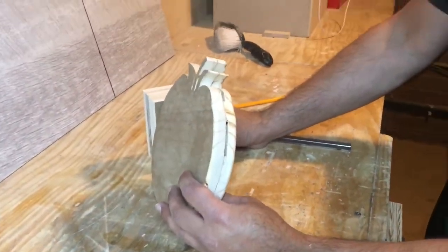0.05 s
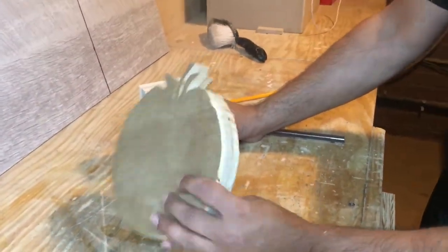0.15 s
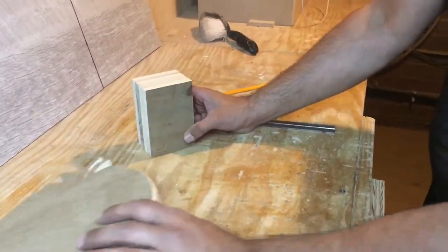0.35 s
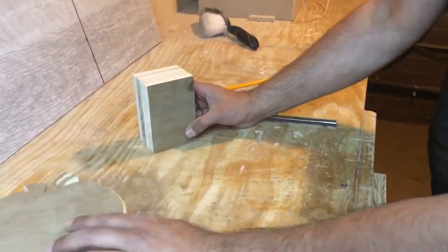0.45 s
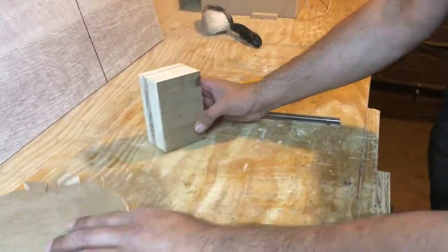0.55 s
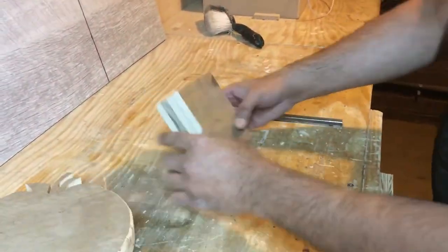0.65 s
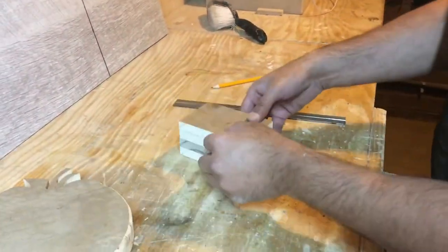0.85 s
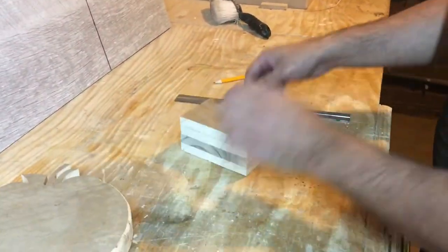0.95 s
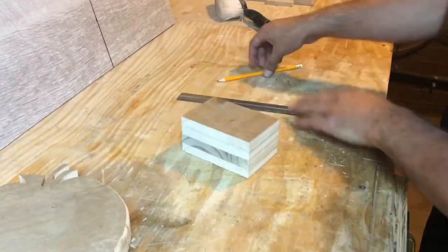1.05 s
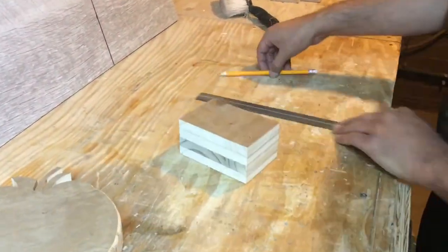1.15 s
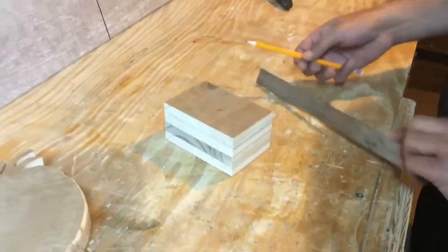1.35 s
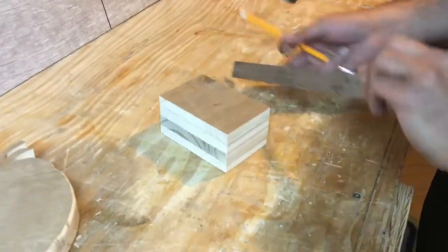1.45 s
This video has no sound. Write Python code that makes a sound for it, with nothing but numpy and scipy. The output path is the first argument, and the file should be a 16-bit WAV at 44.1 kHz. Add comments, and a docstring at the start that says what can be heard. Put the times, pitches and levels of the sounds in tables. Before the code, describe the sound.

Wooden pieces thump and slide on a bench, followed by a steel rule's light rasp.

```python
"""A plywood disc is laid on a wooden workbench and slid aside, juddering, with two tiny squeaks.
Next a block is tipped over, shuffled on its edge and dropped flat: each knock thumps on the
contact and rings block and bench top. Last, a steel rule is dragged off across the boards,
rasping on the grain and ringing thinly. Faint handling rustle and still air lie underneath,
and a short workshop echo follows every move."""
import sys
import numpy as np
from scipy import signal
from scipy.fft import rfft, irfft
from scipy.io import wavfile
from scipy.ndimage import uniform_filter1d, minimum_filter1d

SR = 44100
rng = np.random.default_rng(int(sys.argv[2]) if len(sys.argv) > 2 else 0)


def dump(signal):
    """Clip the signal to [-1, 1] and save it as 16-bit WAV at the path in sys.argv[1]."""
    limited = np.clip(np.atleast_2d(signal).T, -1, 1)
    pcm = np.round(limited * 32767).astype(np.int16)
    wavfile.write(sys.argv[1], SR, pcm)


N = 66150
T = np.arange(N) / SR

# hard knocks of the block (time [s], gain [dB], brightness [Hz], thump pitch [Hz], thump gain [dB],
# bench gain [dB], crack t60 [s], damping t60 [s])
BLOCK_KNOCKS = [(0.6238, -5, 2890, 432, 1, 10, 0.071, 1.5), (0.6325, -17, 1250, 510, 15, 21, 0.07, .5),
                (0.6530, -30.5, 800, 330, 8, 0, 0.038, 0.14), (0.7245, -35.5, 910, 484, 8.5, 0, .04, 0.18),
                (0.7585, -26, 2330, 489, 15, 10, 0.036, 0.63), (0.8040, -23.5, 915, 466, 11.5, 7, .04, .3),
                (0.8195, -41, 722, 485, 7, -1.5, 0.033, .3),
                (0.8655, -16, 1830, 603, -8.5, -13.5, 0.085, 0.49),
                (0.8695, -17.5, 1200, 580, 10.5, -2, 0.061, .2), (0.8920, -1, 2590, 581, 3, 7.5, 0.1, 0.23),
                (0.9000, -13.5, 1400, 383, 7.5, -8, .07, 0.071),
                (0.9080, -19.5, 700, 295, 9.5, -2, 0.06, .2), (0.9775, -46.5, 700, 577, 13.5, 1, .04, .2)]
# soft landings of the disc and the hand (columns as in BLOCK_KNOCKS)
SOFT_LANDINGS = [(0.2228, -20.5, 833, 435, 5.5, 16, 0.072, 0.28),
                 (0.2400, -15.5, 410, 233, -2.5, 13.5, 0.042, 0.56),
                 (0.2680, -33, 334, 200, 13, 22, 0.033, 0.5), (0.2935, -19, 596, 367, -4, 12.5, .04, 0.16),
                 (0.3070, -20.5, 863, 637, 9.5, 2.5, 0.075, .2),
                 (1.0080, -54.5, 560, 368, 22, 3, 0.047, 0.32), (1.4565, -39, 800, 357, 5, -2, 0.065, 0.3)]
# ring of the block (pitch [Hz], gain [dB], t60 [s])
BLOCK_MODES = [(630, -29.5, 0.066), (773, -24, 0.097), (1024, -17.5, 0.038), (1269, -10, 0.043),
               (1438, -4.5, 0.021), (1624, -21.5, 0.045), (1943, -31, 0.05), (2340, -26.5, 0.04),
               (2493, -22, 0.079), (2790, -17, 0.038), (3020, -26.5, .06)]
# thud of a flat, cushioned landing (pitch [Hz], gain [dB], t60 [s])
THUD_MODES = [(370, -0.5, 0.0042), (628, 3, 0.041)]
# ring of the bench top (pitch [Hz], gain [dB], t60 [s])
BENCH_MODES = [(113.6, -30.5, 0.27), (170.4, -30, 0.077), (202, -19, .18), (242.3, -19.5, 0.027),
               (288.6, -24.5, 0.19), (334, -23, 0.1), (419, -24, .1), (484, -16, 0.1), (641.7, -35.5, 0.3)]
# dense splinter of high modes in each blow (frequency [Hz], gain [dB])
CRACK_EQ = [(300, 16.5), (900, 7), (1400, 12), (2800, -2), (4000, -7), (6000, -17), (10000, -16),
            (15000, -23.5)]
# a hard edge meets the bench first (time [s], gain [dB])
EDGE_SNAPS = [(0.6245, -7.5), (0.8918, -4.5)]
# tone of a snap (frequency [Hz], gain [dB])
SNAP_EQ = [(60, -8.5), (600, 10), (1500, 23), (3000, 5), (4500, -5), (9000, -19), (15000, -33.5)]

# the disc's slide (time [s], judder gain [dB], groan gain [dB], grit gain [dB])
SLIDE_FADERS = [(0.25, -51, -60, -63.5), (0.29, -32.5, -37.5, -66), (0.312, -26, -28.5, -56),
                (0.336, -24, -47.5, -53), (0.35, -33, -46.5, -53.5), (0.375, -25.5, -36, -45),
                (0.39, -17.5, -29, -52), (0.403, -38.5, -41, -55.5), (0.42, -20.5, -55.5, -53),
                (0.46, -34.5, -29, -50), (0.471, -38.5, -42.5, -43.5), (0.482, -29.5, -24.5, -45.5),
                (0.514, -26.5, -37, -56), (0.53, -39, -44.5, -77), (0.58, -71.5, -70, -100)]
# resonances of the sliding disc (centre [Hz], width [Hz], gain [dB])
DISC_RESONANCES = [(1490, 45, 2), (1780, 80, -5), (2030, 90, -5), (2310, 90, -8), (2850, 90, -9),
                   (3400, 120, -15), (5650, 400, -28)]
# tone of the grit under the disc (frequency [Hz], gain [dB])
DISC_GRIT_EQ = [(200, -27.5), (600, 5), (900, 20), (2000, 17.5), (4000, -22.5), (8000, -17.5), (15000, -26)]
# squeaks of the disc's edge (middle [s], half length [s], pitch [Hz], gain [dB])
DISC_SQUEAKS = [(0.343, 0.011, 2920, -48.5), (0.501, 0.011, 2785, -53.5)]

# the block's shuffle (time [s], body gain [dB], grit gain [dB])
SHUFFLE_FADERS = [(0.59, -57, -83), (0.61, -32, -46.5), (0.621, -22.5, -43.5), (0.64, -21, -37),
                  (0.69, -32.5, -47.5), (0.702, -37.5, -47.5), (0.728, -27, -40), (0.748, -50.5, -63.5),
                  (0.77, -35, -47), (0.80, -26.5, -52.5), (0.815, -36, -56.5), (0.846, -39, -57.5),
                  (0.858, -34.5, -55.5), (0.885, -24.5, -39), (0.91, -65, -58.5)]
# woody body of the shuffle (frequency [Hz], gain [dB])
SHUFFLE_BODY_EQ = [(60, -28.5), (110, -8.5), (240, -7.5), (380, -2), (520, -4), (680, -5), (900, -23),
                   (1300, -33), (2500, -66)]
# gritty top of the shuffle (frequency [Hz], gain [dB])
SHUFFLE_GRIT_EQ = [(500, 5.5), (1000, -1.5), (1350, 13), (1900, 1.5), (2400, 5), (3300, -10.5),
                   (5000, -18.5), (9000, -39.5), (15000, -47)]

# the rule's drag (time [s], bench gain [dB], grit gain [dB], board hum gain [dB])
DRAG_FADERS = [(1.119, -80, -81, -89), (1.123, -40.5, -48.5, -43.5), (1.16, -46.5, -48, -45),
               (1.185, -54, -41, -37), (1.21, -40, -46.5, -50), (1.228, -48.5, -42, -50),
               (1.285, -38, -42, -47), (1.32, -53.5, -48.5, -63), (1.347, -47.5, -38, -41.5),
               (1.392, -39.5, -52, -40.5), (1.425, -55.5, -70, -48.5), (1.46, -40.5, -61, -36),
               (1.5, -97, -81, -57)]
# resonances of the bench under the rule (centre [Hz], width [Hz], gain [dB])
BENCH_RESONANCES = [(189, 170, 6), (416, 160, -5), (530, 29, 1), (669, 144, -1.5), (920, 42, -15.5),
                    (1062, 39, -9), (1297, 60, -15)]
# tilt over those resonances (frequency [Hz], gain [dB])
BENCH_TILT_EQ = [(110, 8.5), (1300, 22.5), (4000, -12)]
# tone of the rule's rasp (frequency [Hz], gain [dB])
RASP_EQ = [(410, -21.5), (700, -1), (1060, 5.5), (1370, 1.5), (1830, -6), (2050, -8), (2370, -1.5),
           (2990, -13), (3400, -14), (15500, -48)]
# thin ring of the steel (centre [Hz], width [Hz], gain [dB])
RULE_RESONANCES = [(1510, 30, -2), (1870, 25, 1), (2380, 50, 1), (3390, 60, -6), (4900, 90, -14),
                   (6420, 120, -17)]

# grains caught under an edge (time [s], gain [dB])
GRIT_TICKS = [(0.31, -28.5), (0.468, -29), (0.698, -25.5), (0.722, -32), (1.222, -27.5), (1.283, -14),
              (1.346, -25)]
# tone of a tick (frequency [Hz], gain [dB])
TICK_EQ = [(400, -3.5), (1200, 7.5), (2500, 11.5), (4500, -2), (9000, -13), (15000, -27)]
# hands moving on the wood (time [s], level [dB])
RUSTLE_FADER = [(0, -49.5), (.1, -47), (.18, -43.5), (.55, -44.5), (.96, -46), (1.03, -52.5), (1.09, -64),
                (1.16, -46.5), (1.5, -62)]
# tone of the rustle (frequency [Hz], gain [dB])
RUSTLE_EQ = [(50, -41.5), (125, -1.5), (190, -1), (280, -8.5), (430, -15), (540, -8), (750, -22),
             (1500, -30.5), (3000, -41), (8000, -54.5), (15000, -67.5)]
# tone of the workshop echo (frequency [Hz], gain [dB])
ECHO_EQ = [(60, -25), (150, 13), (400, -2.5), (1000, 2), (3000, -5), (10000, -3)]
# tone of the still air (frequency [Hz], gain [dB])
AIR_EQ = [(30, -21.5), (70, -12), (120, 1.5), (300, -10.5), (1000, -22), (3000, -37.5), (8000, -46),
          (15000, -48)]


def knocks():
    """The block strikes hard; the disc and the hand land cushioned, with a steeper treble roll-off."""
    hard = blows(BLOCK_KNOCKS, ring(BLOCK_MODES), lowpass_order=2)
    soft = blows(SOFT_LANDINGS, ring(THUD_MODES), lowpass_order=4)
    return hard + soft


def blows(hits, wood_ring, lowpass_order):
    """Each blow thumps and rings the wood; a softer contact is duller, and the hand damps the ring."""
    thump_trim_db, thump_rise_s, bench_rise_s = -3.5, 0.0021, 0.0017
    bench = ring(BENCH_MODES) * (1 - np.exp(-T / bench_rise_s))
    swell = T / thump_rise_s * np.exp(1 - T / thump_rise_s)
    splinter = undb(15) * eq(signal.unit_impulse(N), CRACK_EQ)
    out = 0
    for s, db, bright_hz, thump_hz, thump_db, bench_db, crack_t60, damping_t60 in hits:
        thump = undb(thump_trim_db + thump_db) * swell * np.sin(2 * np.pi * thump_hz * T)
        crack = convolve(burst(crack_t60), splinter)
        body = (wood_ring + thump + undb(bench_db) * bench + crack) * fade(damping_t60)
        blow = signal.lfilter(*signal.butter(lowpass_order, bright_hz, fs=SR), body)
        out = out + undb(db) * delay(blow, s)
    return out


def snaps():
    """The attack of the two hard landings: one sharp click and a brief crunch."""
    snap = signal.unit_impulse(N) + undb(-4.5) * burst(t60=0.016)
    return eq(sum(undb(db) * delay(snap, s) for s, db in EDGE_SNAPS), SNAP_EQ)


def disc_slide():
    """The disc judders and groans at two low resonances while grit rings its higher modes."""
    judder_db, groan_db, grit_db = curves(SLIDE_FADERS)
    slips = friction(per_s=560, spread_db=5, hiss=0.46)
    judder = steady(resonate(slips, hz=457.6, width_hz=45), span_s=0.015)
    groan = steady(resonate(slips, hz=581, width_hz=35, skirt_q=4), span_s=0.02)
    catches = friction(per_s=900, spread_db=3, hiss=0.6)
    disc_ring = steady(resonances(catches, DISC_RESONANCES), span_s=0.064)
    grit = disc_ring + undb(1) * unit(eq(catches, DISC_GRIT_EQ))
    slide = undb(judder_db) * judder + undb(groan_db) * groan + undb(grit_db) * grit
    return gate(SLIDE_FADERS) * slide


def block_shuffle():
    """The block's edge rubs on the bench before and between its knocks."""
    body_db, grit_db = curves(SHUFFLE_FADERS)
    catches = friction(per_s=900, spread_db=2.5, hiss=0.5)
    body = steady(eq(catches, SHUFFLE_BODY_EQ), span_s=0.088)
    grit = steady(eq(catches, SHUFFLE_GRIT_EQ), span_s=0.034)
    return gate(SHUFFLE_FADERS) * (undb(body_db) * body + undb(grit_db) * grit)


def rule_drag():
    """A steel rule rasps over the grain, rings thinly and sets the boards humming."""
    bench_db, grit_db, hum_db = curves(DRAG_FADERS)
    catches = friction(per_s=1200, spread_db=4, hiss=0.7)
    bench = steady(eq(resonances(catches, BENCH_RESONANCES), BENCH_TILT_EQ), span_s=0.059)
    hum = steady(resonate(catches, hz=348, width_hz=32), span_s=0.055)
    rasp = steady(eq(catches, RASP_EQ), span_s=0.045)
    steel = undb(-10) * unit(resonances(catches, RULE_RESONANCES))
    started = T > DRAG_FADERS[0][0]
    return started * (undb(bench_db) * bench + undb(hum_db) * hum + undb(grit_db) * (rasp + steel))


def ticks():
    """Larger grains snap under a sliding edge."""
    return eq(sum(undb(db) * delay(burst(t60=0.041), s) for s, db in GRIT_TICKS), TICK_EQ)


def squeaks():
    """The disc's edge sticks and slips fast enough to sing for a moment."""
    out = 0
    for middle_s, half_s, hz, db in DISC_SQUEAKS:
        tone = resonate(rng.standard_normal(N), hz, width_hz=60, skirt_q=10)
        swell = np.exp(-((T - middle_s) / half_s) ** 2)
        out = out + undb(db) * swell * steady(tone, span_s=0.041)
    return out


def rustle():
    """Hands shift on the wood with a soft, low rub."""
    rub = eq(friction(per_s=700, spread_db=0.5, hiss=0.72), RUSTLE_EQ)
    return undb(curves(RUSTLE_FADER)[0]) * steady(rub, span_s=0.0073)


def workshop_echo(x):
    """The workshop throws back a tight, dark tail after a short pre-delay."""
    tail = eq(burst(t60=0.053), ECHO_EQ)
    return undb(-10) * convolve(x, delay(tail, s=0.0075))


def still_air():
    """A faint bed of low room tone."""
    return undb(-54.5) * unit(eq(rng.standard_normal(N), AIR_EQ))


def friction(per_s, spread_db, hiss):
    """Fibres catch at random, unequal in size, over a smooth hiss."""
    catches = (rng.random(N) < per_s / SR) * rng.choice([-1, 1], N)
    sizes = undb(spread_db * rng.standard_normal(N))
    return unit(unit(catches * sizes) + hiss * rng.standard_normal(N))


def ring(modes):
    """Struck modes die away, neighbours in opposite polarity."""
    return sum((-1) ** k * undb(db) * fade(t60) * np.sin(2 * np.pi * hz * T)
               for k, (hz, db, t60) in enumerate(modes))


def resonate(x, hz, width_hz, skirt_q=2):
    """One resonance, gain 1 at its centre; a second band-pass trims its skirts."""
    peak = signal.lfilter(*signal.iirpeak(hz, hz / width_hz, fs=SR), x)
    return signal.lfilter(*signal.iirpeak(hz, skirt_q, fs=SR), peak)


def resonances(x, bands):
    """A body's resonances, each coming and going on its own."""
    return sum(undb(db) * flicker() * resonate(x, hz, width_hz) for hz, width_hz, db in bands)


def flicker(spread_db=4, per_s=35):
    """Gain that comes and goes as the contact point moves."""
    times = np.arange(128) / per_s
    return undb(spread_db * np.interp(T, times, rng.standard_normal(len(times))))


def steady(x, span_s):
    """Even out slow swells: a hand pushes with steady force."""
    return x / np.sqrt(uniform_filter1d(x ** 2, int(span_s * SR)) + 1e-12)


def burst(t60):
    """Decaying noise of unit energy."""
    x = rng.standard_normal(N) * fade(t60)
    return x / np.sqrt(np.sum(x ** 2))


def eq(x, points):
    """Minimum-phase EQ through the points, rolling off below the first."""
    hz, db = np.array(points).T
    f = np.maximum(np.arange(N + 1) * SR / (2 * N), 1)
    gain = undb(np.interp(np.log(f), np.log(hz), db)) * np.minimum(f / hz[0], 1) ** 2
    cepstrum = irfft(np.log(gain))[:N]
    cepstrum[1:] *= 2  # no pre-ring ahead of a hit
    response = irfft(np.exp(rfft(cepstrum, 2 * N)))[:N]
    return convolve(x, response)


def curves(faders):
    """One curve per fader column, in straight ramps between its times."""
    times, *columns = np.array(faders).T
    return [np.interp(T, times, column) for column in columns]


def gate(faders):
    """Open while a move lasts, with click-free edges."""
    moving = (T > faders[0][0]) & (T < faders[-1][0])
    return uniform_filter1d(moving.astype(float), size=200)


def fade(t60):
    """Exponential decay, 60 dB down after t60 seconds."""
    return np.exp(-np.log(1000) * T / t60)


def delay(x, s):
    """Start a sound s seconds later."""
    return np.interp(T - s, T, x, left=0)


def convolve(x, response):
    """Play x through an impulse response."""
    return signal.fftconvolve(x, response)[:N]


def undb(db):
    """Decibels to gain."""
    return 10 ** (np.asarray(db) / 20)


def unit(x):
    """Scale to rms 1."""
    return x / np.sqrt(np.mean(x ** 2))


def scene():
    """The mono mix: everything on the bench, its short echo and the still air."""
    scrapes = disc_slide() + block_shuffle() + squeaks() + rule_drag()
    direct = knocks() + snaps() + scrapes + ticks() + rustle()
    return (direct + workshop_echo(direct) + still_air())[None]


def record(dry):
    """The microphone thins the deep bass; a fast limiter holds the peaks, and the top is cut."""
    low_cut_hz, high_cut_hz = 85, 15750
    threshold, hold_s = 0.98, 0.004
    thin = signal.sosfilt(signal.butter(2, low_cut_hz, "high", fs=SR, output="sos"), dry)
    hold = int(hold_s * SR)
    gain = minimum_filter1d(threshold / np.maximum(np.abs(thin), threshold), 2 * hold)
    gain = uniform_filter1d(uniform_filter1d(gain, hold), hold)  # ease in and out of each peak
    return signal.sosfilt(signal.ellip(10, 0.1, 80, high_cut_hz, fs=SR, output="sos"), thin * gain)


dry = scene()
out = record(dry)
dump(out)
```